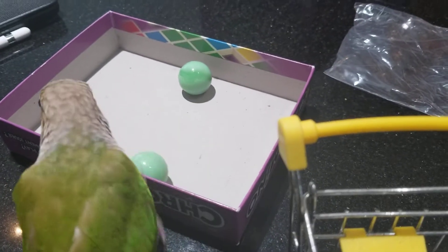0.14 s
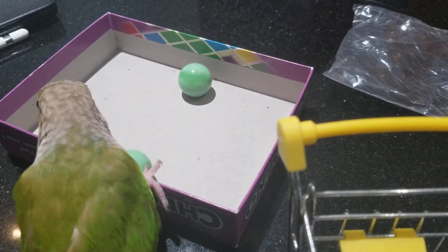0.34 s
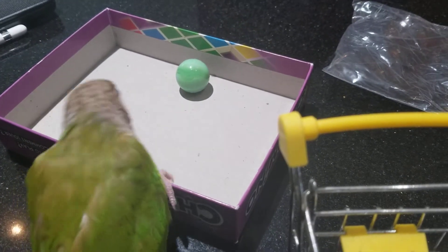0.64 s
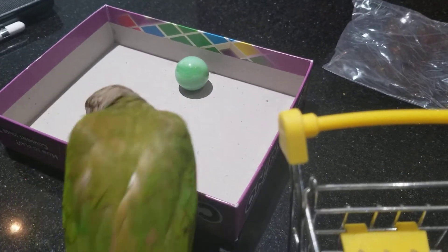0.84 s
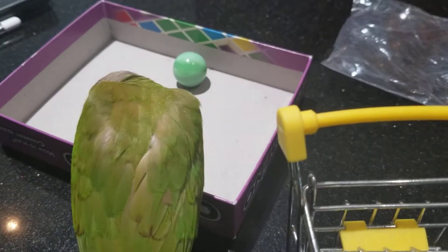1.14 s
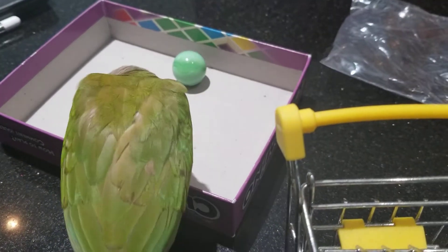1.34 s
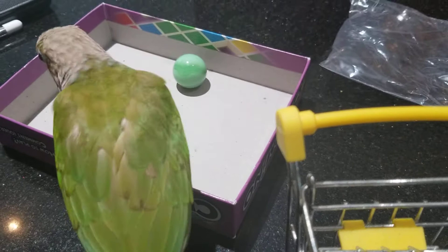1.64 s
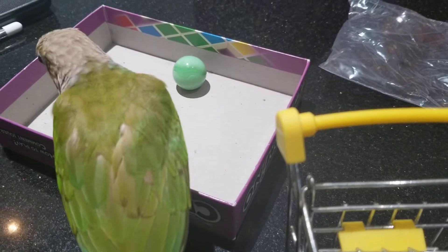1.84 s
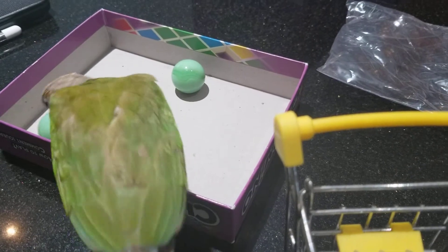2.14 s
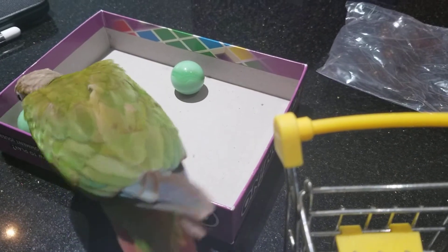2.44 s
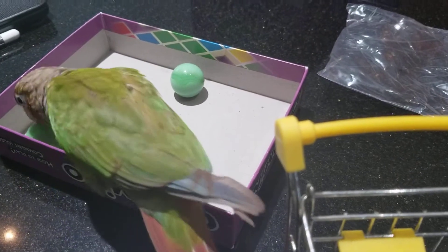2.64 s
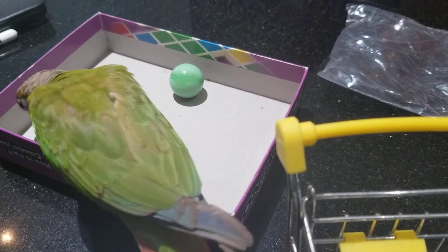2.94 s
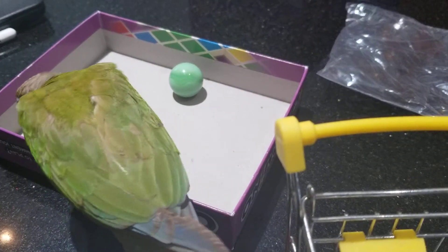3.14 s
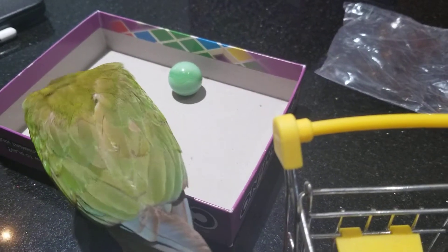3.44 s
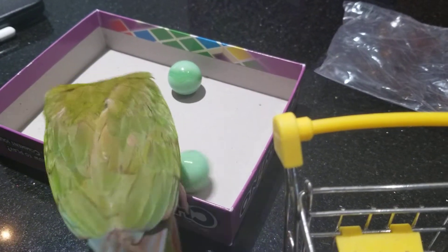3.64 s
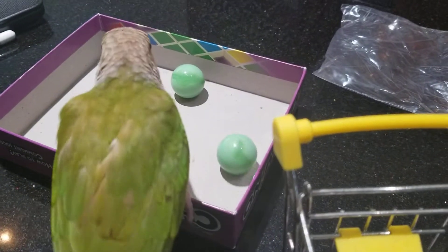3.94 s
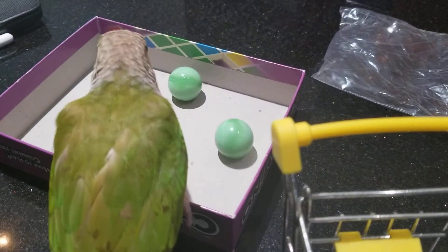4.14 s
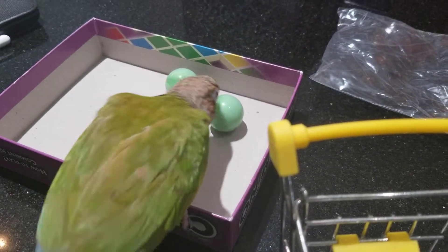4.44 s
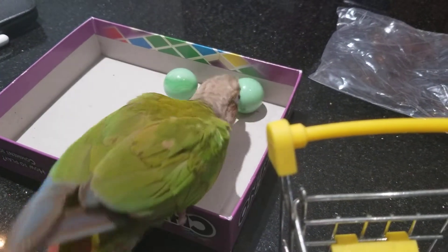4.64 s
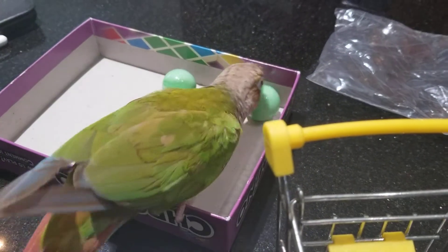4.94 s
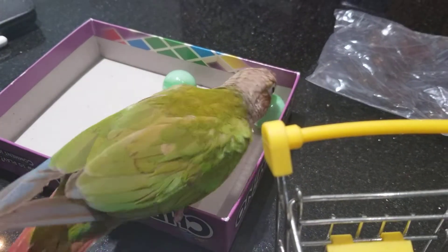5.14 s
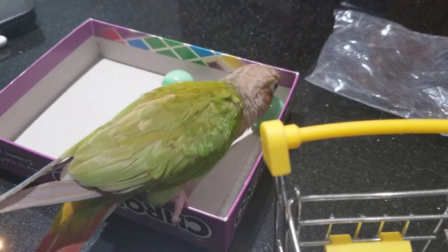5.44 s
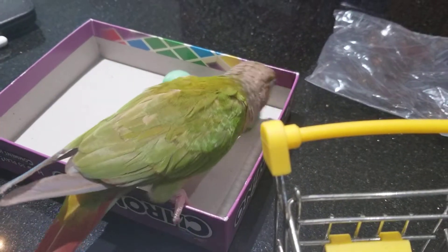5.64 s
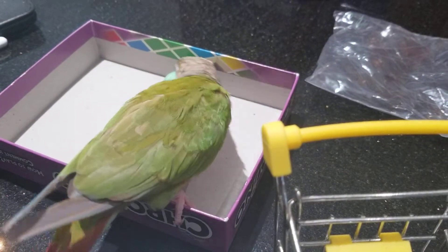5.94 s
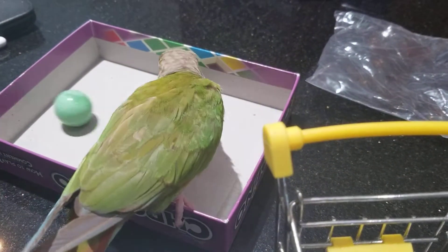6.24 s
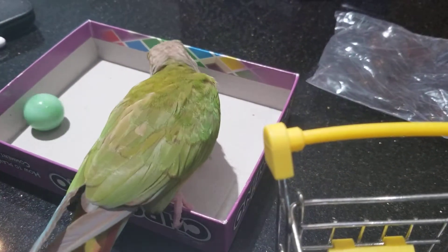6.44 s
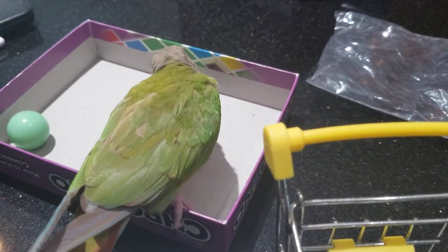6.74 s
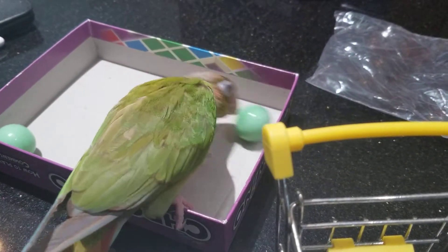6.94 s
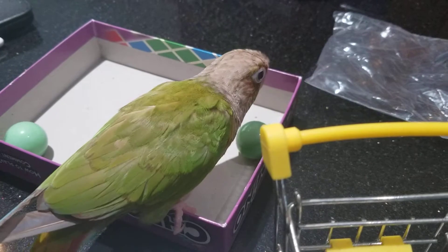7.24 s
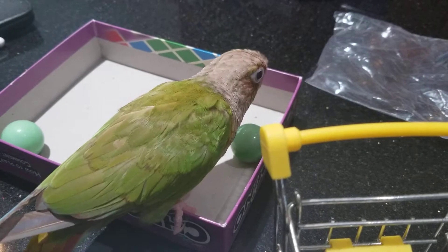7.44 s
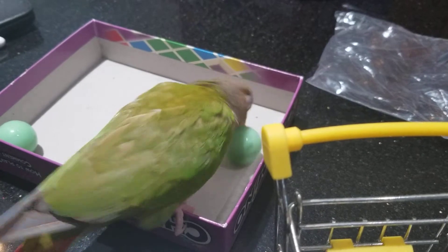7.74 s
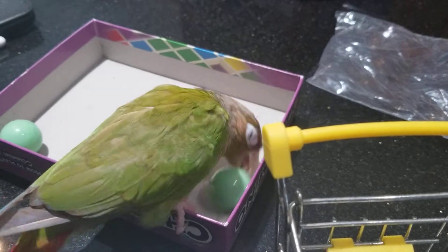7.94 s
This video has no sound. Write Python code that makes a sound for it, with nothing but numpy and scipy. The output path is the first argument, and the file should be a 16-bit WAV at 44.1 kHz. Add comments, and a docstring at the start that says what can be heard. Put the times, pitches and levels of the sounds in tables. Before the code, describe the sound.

Beak and claws click on glass marbles and scratch cardboard, while the marbles knock and briefly rattle against the box.

```python
"""On a counter in a quiet room, a small parrot shoves glass marbles about a shallow cardboard box, close to a
two-port microphone. Each impact excites damped modes: beak and claws click on glass and rap the card; marbles
ring the walls, boom the floor and chatter in quick rebounds. Claws and feathers scratch by stick-slip friction.
The room adds a short reverberation, whose tails below the treble are cut short as they fade, and a low
background noise whose level sinks and recovers."""
import sys
import numpy as np
from scipy import signal
from scipy.fft import rfft, irfft
from scipy.io import wavfile
from scipy.ndimage import uniform_filter1d

SR = 44100
rng = np.random.default_rng(int(sys.argv[2]) if len(sys.argv) > 2 else 0)


def store_wav(level_fs):
    """Save 16-bit WAV to argv[1]."""
    pcm = np.round(np.clip(np.atleast_2d(level_fs), -1, 1) * 32767)
    wavfile.write(sys.argv[1], SR, pcm.T.astype(np.int16))


N = 356769

# Level of the room's rumble: time_s, level_db
RUMBLE_LEVEL = [(0.0, -45.5), (1.28, -46), (1.53, -52.5), (1.83, -57), (2.55, -57), (2.75, -49.5),
                (3.02, -46.5), (3.65, -45.5), (3.85, -47.5), (4.3, -47.5), (5.4, -49), (6.04, -48),
                (7.05, -46), (7.21, -54), (7.75, -55.5), (8.09, -55)]
# Spectral shapes of the low rumble and the murmur above it: frequency_hz, density_db
RUMBLE_SPECTRUM = [(15, -73.5), (25, -20), (59, -4.5), (158, 0), (270, -2.5), (412, -3), (469, -5.5),
                   (638, -11), (692, -13), (1200, -14), (1560, -40), (2640, -120)]
MURMUR_SPECTRUM = [(410, -60.5), (700, -10), (1110, -7.5), (1150, -10), (1250, -10.5), (1360, -10.5),
                   (1870, -11.5), (4800, -35), (6240, -76.5), (10600, -120)]
# Likeness of the background at the two ports: frequency_hz, correlation
PORT_CORRELATION = [(60, .93), (200, 0.94), (380, .78), (700, 0.13), (1300, 0.01), (15000, 0.0086)]
# Claws and feathers drag over card: start_s, hold_s, level_db
RUB_STROKES = [(0.05, 0.059, -61.5), (0.7, 0.1, -69), (0.84, 0.066, -49), (1.0, 0.3, -61),
               (1.455, 0.033, -46.5), (2.25, 0.088, -62), (2.55, 0.58, -64), (3.2, 0.066, -56.5),
               (3.4, 0.39, -55), (4.45, 0.36, -64), (4.62, 0.053, -49.5), (4.852, 0.2, -60.5),
               (5.12, 0.027, -57), (5.45, 0.23, -54), (5.8, 0.22, -65), (6.4, 0.5, -65),
               (6.96, 0.04, -46.5), (7.65, 0.2, -66), (8.035, 0.05, -48)]
# One long scrape along the card: time_s, level_db
SCRAPE_LEVEL = [(2.86, -95), (2.892, -39.5), (2.96, -42), (2.972, -46.5), (3.098, -42), (3.11, -47),
                (3.16, -40.5), (3.185, -52.5), (3.3, -92.5)]
# Modes of hard contact, box walls, box floor and the hollow's air and card: pitch_hz, width_hz, gain_db
TICK_MODES = [(5150, 520, -2), (6670, 2160, 8), (8030, 1540, -1.5), (11070, 3600, -3.5), (11840, 2060, 1.5),
              (13800, 600, -13)]
WALL_MODES = [(1110, 236, -7), (1449, 160, 9), (1790, 810, 14), (2305, 185, 7.5), (2596, 104, 3),
              (2870, 755, 15), (3950, 48, -17), (4300, 1300, -7)]
FLOOR_MODES = [(167, 29, -1), (229.6, 31, 1.5), (319.4, 68, 4.5), (533, 113, 7), (640, 350, -4)]
HOLLOW_MODES = [(930, 85, 8.5), (790, 52, -9.5)]
# Beak and claws on glass (pan is left over right): start_s, tick_db, pan_db, tick_top_db
GLASS_CLICKS = [(0.0564, -26.5, 1, 7), (0.831, -21, -2.1, 1), (0.8472, -13.5, -6.5, 3),
                (0.9472, -25, -1, -7), (0.959, -19.5, -3, -3), (1.1265, -33.5, -8, 15),
                (1.1719, -6.5, -8, 3.5), (1.207, -18, -2.1, -4), (1.313, -38, -6, -2),
                (2.0123, -44, -12, 6), (2.2275, -43, -6, -8), (2.2595, -43, -5, -1),
                (2.333, -43.5, -10, -8), (2.398, -27.5, -6, -3), (2.537, -18.5, -5, -12.5),
                (2.579, -19, -1, -2), (2.617, -24, -1.1, -1), (2.6677, -28, -7, 0), (2.6992, -26.5, -5, -5),
                (2.9261, -18, -2, -9), (2.98, -15, -2, -9), (2.9885, -19, -5, -9), (2.9966, -23, 6, -9),
                (3.208, -18.5, -1, 0), (3.24, -30, 6, 4), (3.31, -29, 2, 4), (3.379, -29.5, -7, 4),
                (3.5325, -0.5, -1.1, -1.5), (3.639, -18, -5, 3), (4.2394, -46, -2, -6),
                (4.686, -20, -5, -6), (4.692, -19, 3, 1.5), (4.874, -20.5, -4, 4), (4.8866, -16.5, 4, -3),
                (5.118, -14, -12, -5), (5.1214, -10.5, -5, -5), (5.17, -20, 2, 4.5),
                (5.215, -1.5, -0.5, -3), (5.5146, -24.5, 0.4, 3), (5.5622, -18, -4, 1.5),
                (6.4695, -21.5, -1, -0.5), (6.7318, -39, -4, -5), (7.655, -34, -3, -3),
                (7.7093, -16, -2.5, 4), (7.842, -24.5, -6, -7), (7.9665, -47, -1, -1)]
# Beak and claws on card: start_s, ring_db, tick_db, pan_db, ring_hz, send_db
CARD_TAPS = [(0.232, -46, -59, -8, 1450, -7), (0.6987, -49.5, -32.5, -4, 1363, 7),
             (1.0825, -37.5, -43.5, -4, 1320, -5.5), (1.279, -44, -41.5, 0, 1420, -3),
             (1.365, -43.5, -42.5, -2, 1594, -5), (1.4482, -17, -10, -7, 2900, -2.5),
             (1.4628, -15.5, -14, -8.5, 2416, -4.5), (2.8445, -47.5, -45, 0, 1960, -1),
             (3.453, -29.5, -22.5, -4, 1320, 10.5), (3.4725, -20.5, -11, -5, 1390, -16),
             (3.621, -22.5, -9, -2.5, 2890, -8), (4.4534, -45, -33, -12.5, 1300, -1),
             (4.6738, -24.5, -18, -10, 2060, -11), (4.9132, -29, -12, -4.5, 2460, -5),
             (4.995, -39, -22.5, -3, 1780, -1.5), (5.039, -28.5, -28, -9, 3050, -10),
             (5.138, -23, -24, -22.5, 1530, -25), (5.1766, -27.5, -21.5, -11, 2030, -17.5),
             (5.436, -27, -23, -8.5, 2400, -1.5), (5.475, -30.5, -19, -10, 1830, -12),
             (5.6701, -44, -24.5, -4.5, 1650, 1.5), (6.2705, -42, -46, 1, 1390, 1),
             (6.4554, -52, -31.5, -2, 1330, 5)]
# A marble rebounds on wall and floor: start_s, length_ms, ring_db, ring_hz, boom_db, boom_hz
MARBLE_RATTLES = [(1.466, 80, -41.5, 2800, -75, 348), (3.476, 23, -42.5, 1890, -65, 354),
                  (3.734, 53.8, -29.5, 2470, -36, 340), (4.622, 92, -35.5, 2015, -52, 282),
                  (5.125, 64, -41.5, 1633, -55, 350), (5.442, 72, -50, 2100, -61, 353),
                  (6.352, 41, -36.5, 2135, -45.5, 480), (6.965, 86, -29, 2530, -36, 262),
                  (8.04, 43, -47.5, 1900, -50.5, 420)]
# A marble hits a wall: start_s, ring_db, tick_db, pan_db, ring_hz, send_db, boom_db, boom_hz, hollow_db
MARBLE_KNOCKS = [(3.7299, -12.5, -1.5, -1, 2325, -4.5, -17, 532, -23),
                 (4.615, -11.5, -16, 3.5, 1680, -10, -21, 284, -25),
                 (6.3505, -25.5, -19.5, -9.5, 2160, -0.5, -26, 431, -31.5),
                 (6.3554, -49, -36, -10, 2110, -26, -20, 554, -17.5),
                 (6.9532, -19.5, -42, -2, 1400, -20, -29, 346, -32),
                 (6.9612, -14, -14.5, -0.5, 2400, 0.5, -21, 237, -21),
                 (7.8237, -41.5, -30, 1.5, 2400, -9, -44.5, 425, -47),
                 (8.029, -8.5, -14.5, -4, 1480, -14.5, -17.5, 460, -34.5)]

MURMUR_UNDER_DB, HISS_UNDER_DB = 4.5, 23.5   # both follow the rumble's level
STROKE_RISE_DB_PER_S, STROKE_FALL_DB_PER_S = 602.5, 100
RASP_HZ, RASP_OCTAVES, RASP_DB = 3300, 0.4, -13.5
CLICK_MS, TAP_MS, KNOCK_MS = 11, 10.8, 10.5
CLICK_RING_DB, CLICK_RING_HZ, CLICK_SEND_DB = -32, 2700, -4   # the box barely rings under a click
TICK_TOP_HZ, TAP_TOP_DB, KNOCK_TOP_DB = 9500, -4.5, -6   # card dulls the top of the tick
ROOM_GAP_S, ROOM_FADE_S, ROOM_ALIKE_HZ = 0.017, 0.029, 550
GATE_DB, GATE_MS, GATE_BELOW_HZ = -43, 16, 2780


def from_db(db):
    """Amplitude ratio of a level in decibels."""
    return 10 ** (np.asarray(db) / 20)


def unit_rms(x):
    """Normalisation to rms 1."""
    return x / np.sqrt(np.mean(x ** 2) + 1e-20)


def in_time(curve):
    """Linear interpolation of a curve at every sample."""
    return np.interp(np.arange(N) / SR, *np.transpose(curve))


def at_hz(spectrum, hz):
    """Interpolation on a log-frequency axis."""
    known_hz, values = np.transpose(spectrum)
    return np.interp(np.log(hz), np.log(known_hz), values)


def drift(rate_hz):
    """Random modulation: low-passed noise of rms 1."""
    pole = np.exp(-2 * np.pi * rate_hz * 40 / SR)   # one step per 40 samples
    slow = signal.lfilter([1], [1, -2 * pole, pole * pole], rng.standard_normal(N // 40 + 2002))[2000:]
    return np.interp(np.arange(N) / 40, np.arange(len(slow)), unit_rms(slow))


def high_pass(x, hz, order=4):
    """Attenuation below hz, 6 dB per octave for each order."""
    return signal.sosfilt(signal.butter(order, hz, "high", fs=SR, output="sos"), x)


def resonate(force, hz, width_hz):
    """Damped oscillator: the wider the band, the faster the decay."""
    radius, angle = np.exp(-np.pi * width_hz / SR), 2 * np.pi * hz / SR
    return signal.lfilter([0.5, 0, -0.5], [1, -2 * radius * np.cos(angle), radius ** 2], force + 1e-18)


def driven(force, modes):
    """Forced vibration: modal responses superpose, signs alternating."""
    return sum((-1) ** k * from_db(db) * resonate(force, hz, width)
               for k, (hz, width, db) in enumerate(modes))


def near(modes, centre_hz, octaves):
    """Selective excitation: the spot touched favours modes near one pitch, 6 dB less `octaves` away."""
    return [(hz, width, db - 6 * (np.log2(hz / centre_hz) / octaves) ** 2) for hz, width, db in modes]


def room_noise(spectrum, flicker_db):
    """Partial coherence: gently flickering noise of rms 1, alike at both ports in the bass."""
    hz = np.maximum(np.arange(N // 2 + 1) * SR / N, 1)
    mid, side = rfft(rng.standard_normal((2, N))) * from_db(at_hz(spectrum, hz))
    alike = at_hz(PORT_CORRELATION, hz)
    pair = np.sqrt(1 + alike) * mid + np.sqrt(1 - alike) * side * [[1], [-1]]
    return unit_rms(irfft(pair, N) * from_db(flicker_db * drift(11)))


def rubbing_level(hiss_db):
    """Incoherent addition: strokes, the long scrape and a faint hiss sum in power; result in dB."""
    t = np.arange(N) / SR
    power = from_db(2 * hiss_db) + from_db(2 * in_time(SCRAPE_LEVEL))
    for start_s, hold_s, level_db in RUB_STROKES:
        loss_db = STROKE_RISE_DB_PER_S * np.maximum(start_s - t, 0)
        loss_db += STROKE_FALL_DB_PER_S * np.maximum(t - start_s - hold_s, 0)
        power += from_db(2 * (level_db - loss_db))
    return 10 * np.log10(power)


def scratch(level_db, slips_per_s, spread_db, smooth):
    """Stick-slip friction: slips and a smooth rub drive the tick modes; pressure adds a wall rasp."""
    sizes = from_db(spread_db * np.minimum(rng.exponential(1, (2, N)), 4)) * rng.choice([-1, 1], (2, N))
    slips = sizes * (rng.random(N) < slips_per_s * from_db(3 * drift(20)) / SR)
    pressure = np.clip((level_db + 63) / 18, 0, 1)   # faint rubbing is all smooth
    force = pressure * unit_rms(slips) * from_db(4 * drift(29)) + smooth * rng.standard_normal((2, N))
    hiss = unit_rms(high_pass(driven(force, TICK_MODES), 5100))
    rasp = unit_rms(driven(force, near(WALL_MODES, RASP_HZ, RASP_OCTAVES)))
    return from_db(level_db) * (hiss + from_db(RASP_DB) * pressure * rasp)


def jolt(alike, length_ms):
    """Transient force: a noise burst, partly shared by the ports, decaying 60 dB in length_ms."""
    age = np.arange(SR // 14) / SR * 1000 * np.log(1000) / length_ms   # in time constants
    shared, left, right = rng.standard_normal((3, len(age))) * (1 - np.exp(-2.5 * age)) * np.exp(-age)
    return alike * shared + (1 - alike) * np.array([left, right])


def strike(force, modes):
    """Impact excitation: each mode takes the energy of a unit impulse, then its own gain."""
    out = 0
    for k, (hz, width, db) in enumerate(modes):
        ring = resonate(force, hz, width)
        impulse_energy = SR / (4 * np.pi * width)
        ring *= np.sqrt(impulse_energy / np.sum(ring ** 2, axis=1, keepdims=True))
        out += (-1) ** k * from_db(db) * ring
    return out


def impact(ring_db, tick_db, pan_db, ring_hz, length_ms, top_db, *marble):
    """Free vibration after a blow: tick and wall ring; a marble adds floor boom and a hollow note."""
    ring = strike(jolt(0.2, length_ms), near(WALL_MODES, ring_hz, octaves=0.79))
    tick_modes = [(hz, width, db + top_db * (hz > TICK_TOP_HZ)) for hz, width, db in TICK_MODES]
    tick = high_pass(strike(jolt(0.073, length_ms), tick_modes), 5870)
    out = high_pass(from_db(ring_db) * ring + from_db(tick_db) * tick, 1100)
    out *= from_db([[pan_db / 2], [-pan_db / 2]])
    if marble:
        boom_db, boom_hz, hollow_db = marble
        boom = strike(jolt(0.67, length_ms=22), near(FLOOR_MODES, boom_hz, octaves=0.61))
        hollow = strike(jolt(0.81, length_ms=15.3), HOLLOW_MODES)
        out += from_db(boom_db) * boom + from_db(hollow_db) * hollow
    return out


def contacts():
    """Superposition of all clicks, taps and knocks: the direct sound and the share sent to the room."""
    clicks = [(start_s, db + CLICK_RING_DB, db, pan_db, CLICK_RING_HZ, CLICK_SEND_DB, CLICK_MS, top_db)
              for start_s, db, pan_db, top_db in GLASS_CLICKS]
    taps = [(*tap, TAP_MS, TAP_TOP_DB) for tap in CARD_TAPS]
    knocks = [(*knock[:6], KNOCK_MS, KNOCK_TOP_DB, *knock[6:]) for knock in MARBLE_KNOCKS]
    direct, send = np.zeros((2, 2, N + SR))
    for start_s, ring_db, tick_db, pan_db, ring_hz, send_db, *rest in knocks + taps + clicks:
        sound = impact(ring_db, tick_db, pan_db, ring_hz, *rest)
        i = round(start_s * SR)
        direct[:, i:i + sound.shape[1]] += sound
        send[:, i:i + sound.shape[1]] += from_db(send_db) * sound
    return direct[:, :N], send[:, :N]


def reverberation(send):
    """Reflection: near surfaces answer first, far walls after a gap; decay is almost exponential."""
    t = np.arange(SR // 3) / SR
    early = np.clip(t / 0.00073, 0, 1)
    late = np.clip(t / ROOM_GAP_S, 0, 1) ** 3
    envelope = (early + late) * np.exp(-(t / ROOM_FADE_S) ** 0.99)
    echoes = rng.standard_normal((2, len(t))) * envelope / np.sqrt(np.sum(envelope ** 2))
    # Long waves reach both ports alike.
    echoes[1] = echoes[0] + high_pass(echoes[1] - echoes[0], ROOM_ALIKE_HZ, order=1)
    crossfed = 0.91 * send + 0.22 * send[::-1]
    return signal.fftconvolve(crossfed, echoes, axes=1)[:, :N]


def noise_gate(tails):
    """Downward expansion: below the treble, tails are suppressed as they sink under a threshold."""
    low = signal.sosfiltfilt(signal.butter(3, GATE_BELOW_HZ, fs=SR, output="sos"), tails)
    power = uniform_filter1d(np.mean(low ** 2, axis=0), size=int(GATE_MS * SR / 1000))
    return tails - low / (1 + np.abs(power / from_db(2 * GATE_DB)) ** 0.55)


def rattles(bounces_per_s, spread_db):
    """Repeated rebound: a marble's random impulses on wall and floor swell, sink and stop short."""
    out = np.zeros((2, N + SR))
    n = SR // 6
    for start_s, length_ms, ring_db, ring_hz, boom_db, boom_hz in MARBLE_RATTLES:
        progress = np.arange(n) / SR * 1000 / length_ms
        envelope = np.clip(progress / 0.089, 0, 1) * np.exp(-1.6 * progress)
        envelope *= np.clip((1 - progress) / 0.28, 0, 1)
        hits = rng.random(n) < bounces_per_s / SR
        sizes = from_db(spread_db * rng.standard_normal(n))
        bounces = envelope * hits * sizes * rng.standard_normal((3, n))
        soften = signal.butter(2, 3.1 * ring_hz, fs=SR, output="sos")   # card gives under the marble
        force = signal.sosfilt(soften, bounces + 1e-18)
        shared, sides = force[0], force[1:]
        ring = unit_rms(strike(sides, near(WALL_MODES, ring_hz, octaves=0.15)))
        boom = unit_rms(strike(shared + 0.35 * sides, near(FLOOR_MODES + HOLLOW_MODES, boom_hz, 1)))
        scale = np.sqrt(n / (length_ms * SR / 1000))   # refers the rms to the rattle's own length
        i = round(start_s * SR)
        out[:, i:i + n] += scale * (from_db(ring_db) * high_pass(ring, 670) + from_db(boom_db) * boom)
    return out[:, :N]


def scene():
    """Linear superposition: contacts, rattles, gated reverberation, scratching and room noise."""
    direct, send = contacts()
    rumble_db = in_time(RUMBLE_LEVEL)
    rumble = room_noise(RUMBLE_SPECTRUM, flicker_db=0.78)
    murmur = from_db(-MURMUR_UNDER_DB) * room_noise(MURMUR_SPECTRUM, flicker_db=1.5)
    background = from_db(rumble_db) * (rumble + murmur)
    rub = scratch(rubbing_level(rumble_db - HISS_UNDER_DB), slips_per_s=7600, spread_db=4, smooth=0.89)
    rub *= from_db([[-0.8], [0.8]])   # slightly to the right
    chatter = rattles(bounces_per_s=2100, spread_db=0.5)
    return direct + chatter + noise_gate(reverberation(send)) + rub + background


def record(dry):
    """Saturation and band limiting: peaks are rounded and the treble fades out above about 15 kHz."""
    rounded = 1.5 * np.tanh(dry / 1.5)
    heard = signal.sosfilt(signal.butter(8, 14900, fs=SR, output="sos"), rounded)
    return signal.sosfilt(signal.cheby2(12, 70, 15800, fs=SR, output="sos"), heard)


dry = scene()
out = record(dry)
store_wav(out)
```